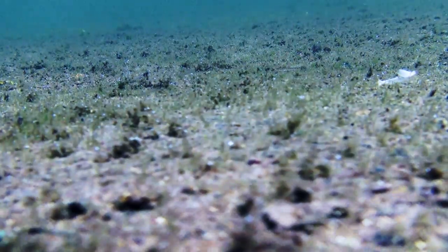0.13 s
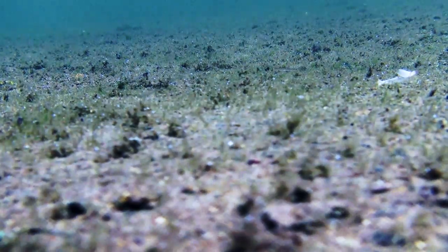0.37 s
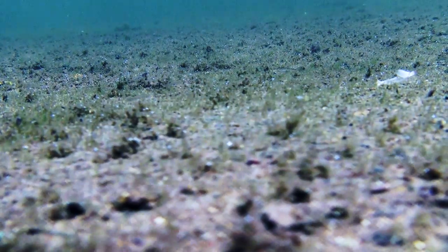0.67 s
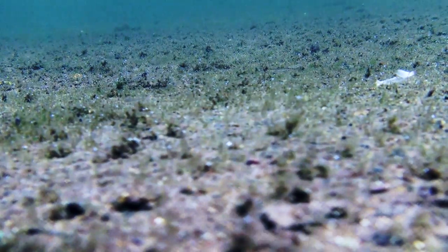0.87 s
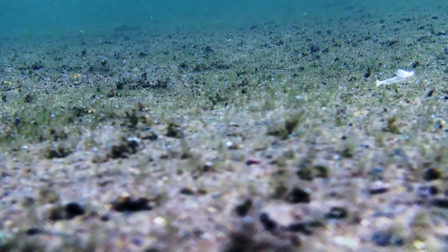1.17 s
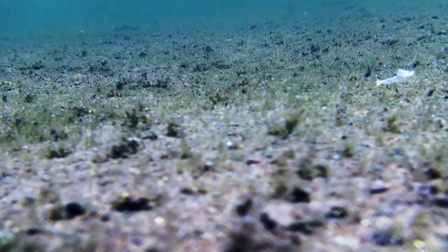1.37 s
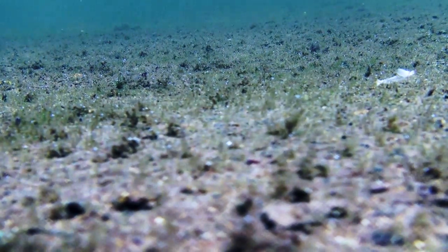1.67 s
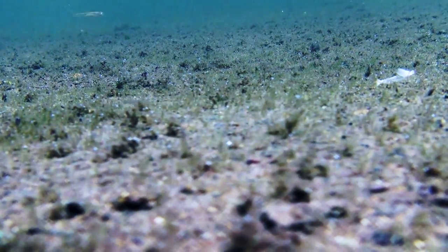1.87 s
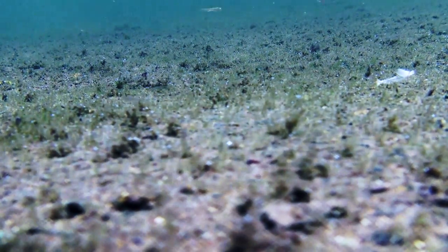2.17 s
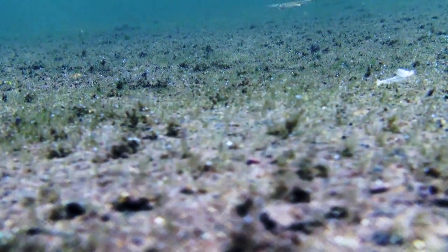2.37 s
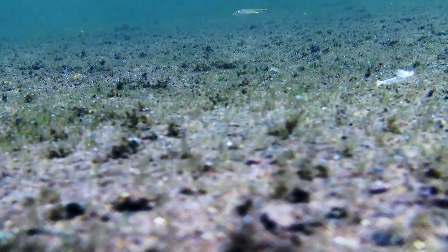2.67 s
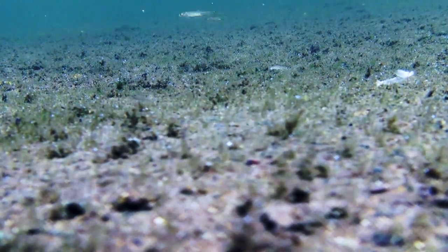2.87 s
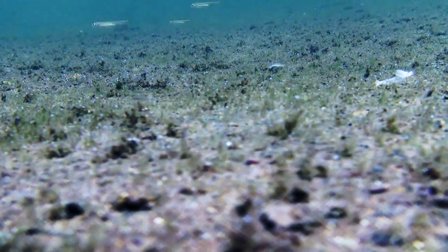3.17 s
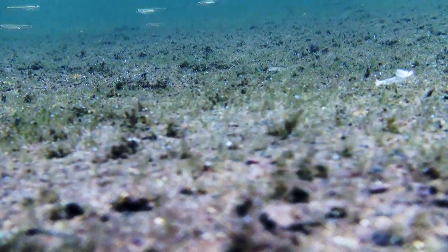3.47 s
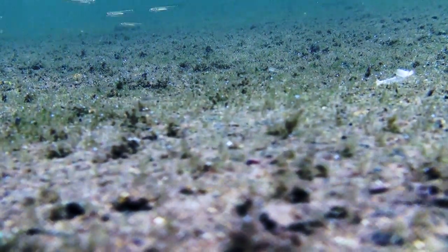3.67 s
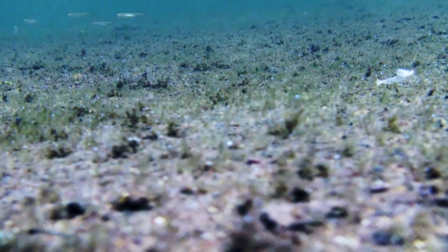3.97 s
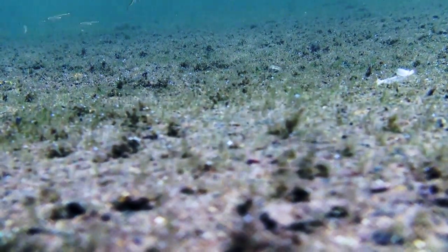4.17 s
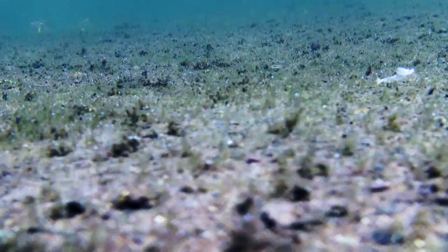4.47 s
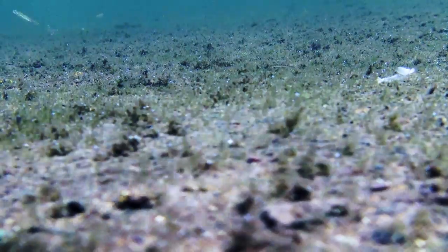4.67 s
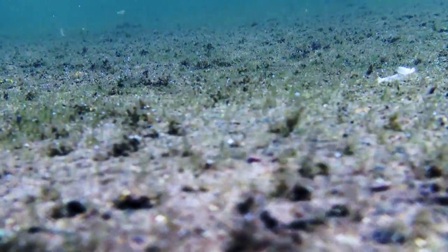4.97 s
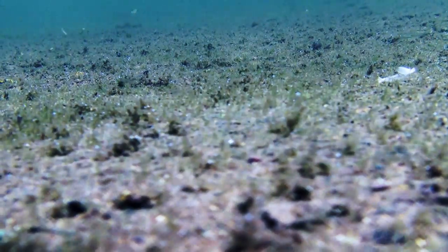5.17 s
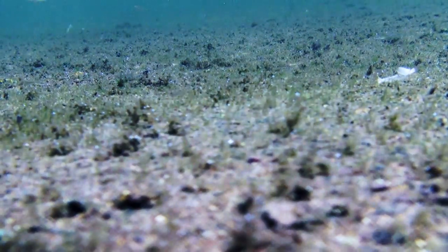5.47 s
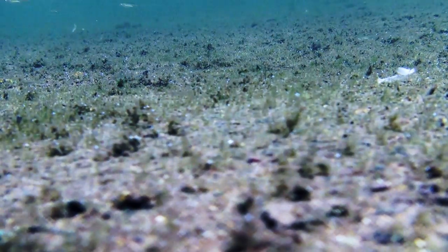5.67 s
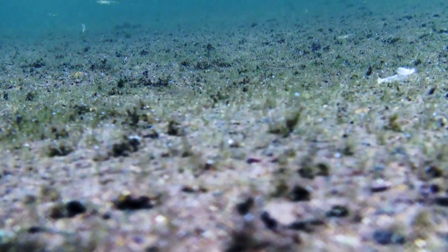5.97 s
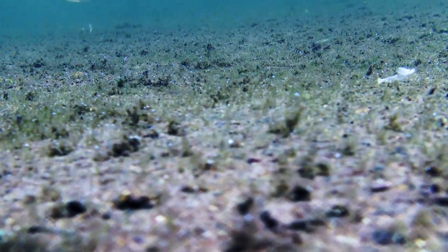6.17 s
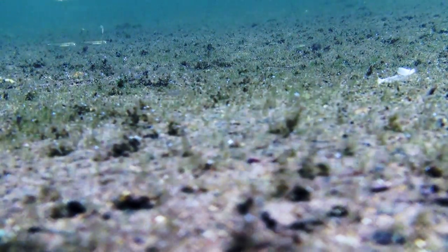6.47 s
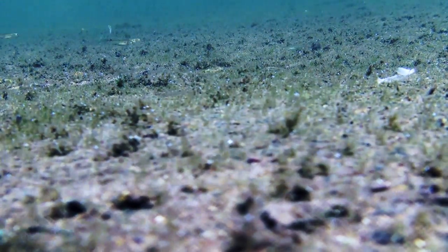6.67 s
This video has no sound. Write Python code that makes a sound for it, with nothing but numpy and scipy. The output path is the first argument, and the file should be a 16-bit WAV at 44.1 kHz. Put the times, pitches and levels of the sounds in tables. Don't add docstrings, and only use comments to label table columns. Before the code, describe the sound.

Inside a sealed housing on a stony river bed, turbulent water hisses steadily with a fine sprinkle of grit. Dull, low, short-ringing knocks come in a busy cluster during the first second, then thin out. A stronger bunch of thumps and a brief surge of water arrive just after three seconds, followed by scattered single and double knocks. Small hollow ticks accompany some of them. Very close, muffled and dry.

```python
import sys
import numpy as np
from scipy import signal
from scipy.fft import rfft, irfft
from scipy.io import wavfile

SR = 44100
rng = np.random.default_rng(int(sys.argv[2]) if len(sys.argv) > 2 else 0)


def to_linear_factor(level_db):
    exponent = np.asarray(level_db, float) / 20
    return 10 ** exponent


def wav_record(signal):
    frames = np.transpose(np.atleast_2d(signal))
    bounded = np.clip(frames, -1, 1)
    quanta = np.round(bounded * 32767).astype(np.int16)
    wavfile.write(sys.argv[1], SR, quanta)


N = 300879

# (pitch [Hz], rise time [s], time to fall 60 dB [s], level [dB])
HOUSING_MODES = [
    (146.6, 0.0037, 0.19, -0.5),
    (213, 0.006, 0.085, 4),
    (289.3, 0.002, 0.062, 6),
    (65, 0.0039, 0.17, -2.5),
]
CONTACT_LEAD_S = 0.003


def rms_one(x):
    return x / np.sqrt(np.mean(x ** 2) + 1e-20)


def coloured(points):
    hz, db = np.transpose(points)
    bins_hz = np.maximum(np.arange(N // 2 + 1) * SR / N, 1)
    colour_db = np.interp(np.log(bins_hz), np.log(hz), db)
    return rms_one(irfft(rfft(rng.standard_normal(N)) * to_linear_factor(colour_db), N))


def drift(rate_hz):
    r = np.exp(-2 * np.pi * rate_hz / SR)
    wander = signal.lfilter([1], [1, -2 * r, r * r], rng.standard_normal(N + SR))
    return rms_one(wander[SR:])


def through_shell(x):
    # (centre [Hz], width [Hz], level [dB])
    shell_peaks = [(447, 126, 4.5), (637, 81, -6), (910, 113, 8.5), (999.6, 75, -10.5), (1129, 65, 5.5),
                   (1186, 51, -8), (1304, 125, 3.5), (1489, 196, 9), (1750, 510, -6), (2013, 133, -16.5),
                   (2170, 185, 4), (2600, 450, 3.5), (2760, 137, -8.5), (2875, 126, 4.5), (3250, 110, -1),
                   (3380, 110, 2.5), (3780, 170, -5), (4770, 340, 7.5), (5600, 220, -0.5), (5910, 170, 11)]
    filters = []
    for hz, width_hz, db in shell_peaks:
        g = to_linear_factor(db / 2)
        a = np.pi * width_hz / SR
        c = -2 * np.cos(2 * np.pi * hz / SR)
        row = np.array([1 + a * g, c, 1 - a * g, 1 + a / g, c, 1 - a / g])
        filters.append(row / (1 + a / g))
    return signal.sosfilt(filters, x)


def sand_grains(grit_per_s):
    size_db = 3.9 * np.minimum(rng.exponential(1, N), 4)
    clicks = to_linear_factor(size_db) * rng.choice([-1, 1], N) * (rng.random(N) < grit_per_s / SR)
    band = signal.butter(4, [250, 1800], "band", fs=SR, output="sos")
    return rms_one(signal.sosfilt(band, clicks))


def current(flicker_db, grit_per_s, grit_db):
    # (frequency [Hz], level per Hz [dB])
    water_colour = [(20, -7.5), (40, -6), (60, -14.5), (100, -9), (200, -5.5), (400, -4.5), (1500, -3),
                    (2500, -8), (3400, -18.5), (3800, -30), (5000, -31.5), (7000, -53.5), (16000, -67)]
    # (time [s], level above usual [dB])
    turbulence = [(0.0, 0), (0.5, 1), (0.97, -2.5), (1.31, 1), (1.8, -0.8), (2.62, -1), (3.1, -2),
                  (3.25, 9), (3.38, -1.5), (3.6, 1.7), (4.6, -1), (5.36, 2.5), (5.81, -1.5), (6.32, -0.2),
                  (6.82, 1.5)]
    edges_hz = 20, 200, 770, 2000, 16000
    shares = 0.95, 0.32, 0.071, 0.063
    water = coloured(water_colour) + to_linear_factor(grit_db) * sand_grains(grit_per_s)
    steady = rfft(rms_one(through_shell(water)))
    hz = np.arange(len(steady)) * SR / N
    flow_db = np.interp(np.arange(N) / SR, *np.transpose(turbulence))
    out = np.zeros(N)
    for low, high, share in zip(edges_hz, edges_hz[1:], shares):
        flicker = flicker_db * (drift(17.0) + 0.57 * drift(40))
        band = irfft(steady * (hz >= low) * (hz < high), N)
        out += to_linear_factor(share * flow_db + flicker) * band
    return to_linear_factor(-46.5 + 0.99) * out


def add_ring(out, s, db, hz, rise_s, t60):
    damping_growth = 1.14
    at = int(s * SR)
    length = min(int(1.2 * t60 * SR) + 9, N - at)
    t = (np.arange(length) + 1 - (s * SR - at)) / SR
    swell = (1 - np.exp(-t / rise_s)) ** 2
    shape = swell * to_linear_factor(-60 * (t / t60) ** damping_growth)
    out[at:at + len(t)] -= to_linear_factor(db) * shape / shape.max() * np.sin(2 * np.pi * hz * t)


def knocks(detune):
    # (time [s], peak level [dB], edge-on tilt [dB], ring length [factor])
    firm_knocks = [(0.155, -32, -5, 0.88), (0.166, -28.5, -2.5, 0.45), (0.187, -38, -5, 0.69),
                   (0.368, -41, -2, 0.83), (0.391, -41, -22, 0.85), (0.479, -41.5, 7, 0.7),
                   (0.499, -45, -1, 0.86), (0.544, -40, 3.5, 1.16), (0.567, -36, -13, 0.8),
                   (0.780, -33.5, -7, 0.63), (0.807, -44, -2, 0.57), (0.933, -38.5, -6, 0.73),
                   (1.328, -36.5, -0.5, 0.64), (1.34, -39.5, 10, 0.9), (3.128, -37.5, -12, 0.55),
                   (3.146, -41, -3.5, 0.8), (3.190, -32.5, -4.5, 1.2), (3.1995, -34, 13, 0.51),
                   (3.216, -35.5, 9, 1.35), (3.2415, -30.5, 16, 1), (3.604, -37, -13, 0.45),
                   (3.617, -45, 0.5, 0.91), (4.1, -36.5, -5, 0.89), (4.701, -32, -18, 0.64),
                   (4.708, -30, -7.5, 1.12), (4.862, -42.5, 0, 0.81), (5.171, -36.5, 9, 1.1),
                   (5.176, -28.5, -10, 0.77), (5.557, -38.5, -19, 0.83), (6.692, -41.5, -4, 0.72)]
    # (time [s], peak level [dB], edge-on tilt [dB])
    light_nudges = [(0.034, -51.5, 6), (.104, -46.5, 1.5), (0.596, -47, 2), (.66, -49, -1.5),
                    (.881, -47.5, 9), (.958, -48.5, -4), (1.199, -56, 8), (1.378, -49.5, 5),
                    (1.616, -55.5, -3), (3.169, -46, -3), (3.871, -47, -6.5), (3.901, -52, -12),
                    (4.005, -52, -2.5), (4.232, -57, 8), (5.548, -50, 6), (6.674, -46.5, -2.5),
                    (6.714, -50, 0), (6.762, -49.5, -6)]
    nudge_length, third_mode_db, sway_db = 1.12, -5, -20.5
    hits = list(firm_knocks) + [tuple(row) + (nudge_length,) for row in light_nudges]
    out = np.zeros(N)
    chance = rng.standard_normal((len(hits), len(HOUSING_MODES)))
    for (s, peak_db, tilt_db, length), shifts in zip(hits, chance):
        length = max(length, 0.2)
        first_db = peak_db - max(tilt_db, 0)
        second_db = peak_db + min(tilt_db, 0)
        levels = first_db, second_db, second_db + third_mode_db, peak_db + sway_db
        for level_db, shift, (hz, rise_s, t60, db) in zip(levels, shifts, HOUSING_MODES):
            pitch_hz = hz * (1 + detune * shift)
            add_ring(out, s - CONTACT_LEAD_S, level_db + db, pitch_hz, rise_s * length, t60 * length)
    return out


def sways():
    # (time [s], peak level [dB])
    tips = [(.104, -51), (.166, -50), (.368, -48), (.597, -46), (.807, -47), (1.328, -51), (3.244, -47),
            (3.617, -53), (4.1, -52), (4.289, -54), (4.859, -49), (4.884, -54), (5.179, -44), (6.138, -57),
            (6.692, -61)]
    out = np.zeros(N)
    hz, rise_s, t60, db = HOUSING_MODES[-1]
    for s, peak_db in tips:
        add_ring(out, s - CONTACT_LEAD_S, peak_db + db, hz, rise_s, 0.97 * t60)
    return out


def ticks():
    # (time [s], peak level [dB], pitch [Hz])
    strikes = [(.155, -37, 480), (.166, -39, 560), (.62, -32.5, 480), (0.728, -32.5, 510),
               (0.7284, -33, 1340), (.7492, -28, 1520), (.756, -32, 1550), (.793, -38, 1750),
               (.812, -34, 1470), (0.816, -35, 473), (1.326, -43, 3150), (1.337, -38, 297),
               (1.327, -36, 1500), (1.327, -41, 2270), (1.328, -31.5, 715), (3.135, -36, 910),
               (3.191, -31, 496), (3.202, -32, 606), (3.222, -35, 540), (3.244, -25.5, 540),
               (3.246, -36, 1300), (4.704, -41, 680), (4.715, -39, 405), (5.167, -36, 590),
               (5.178, -39, 480), (5.18, -45, 720), (6.351, -35.5, 454), (6.3712, -33, 715),
               (6.378, -36, 600), (6.403, -35, 1310)]
    out = np.zeros(N)
    for s, db, hz in strikes:
        ring_s = max(0.007 + 3.0 / hz, 0.003)
        add_ring(out, s, db, hz, 0.42 / hz, ring_s)
    return out


def self_noise():
    # (frequency [Hz], level per Hz [dB])
    hiss_colour = [(3820, -30), (6500, -1.5), (14900, -6), (15500, -6)]
    flat_below = [(20, hiss_colour[1][1])] + list(hiss_colour[1:])
    return to_linear_factor(-76.5 + 4.0) * coloured(flat_below)


def scene():
    capsule = current(flicker_db=0.63, grit_per_s=200, grit_db=-10.0)
    capsule += knocks(detune=0.019) + sways() + ticks() + self_noise()
    return np.array([capsule, capsule])


def gain_control():
    duck_s, duck_db, recover_db_per_s = 3.2, 2.1, 2.3
    since = np.arange(N) / SR - duck_s
    drop_db = (since > 0) * np.maximum(duck_db - recover_db_per_s * since, 0)
    return to_linear_factor(-signal.lfilter([0.002], [1, -0.998], drop_db))


def roll_off(x):
    return signal.sosfilt(signal.butter(12, 15670, fs=SR, output="sos"), x)


def record(dry):
    phase_corner_hz = 1058, 1660
    top_cut_hz, width_top_hz = 15720, 3580
    dry = signal.sosfilt(signal.ellip(10, 0.3, 60, top_cut_hz, fs=SR, output="sos"), dry)
    levelled = gain_control() * dry
    corners = np.tan(np.pi * np.array(phase_corner_hz) / SR)
    left, right = (signal.lfilter([c - 1, c + 1], [c + 1, c - 1], x) for x, c in zip(levelled, corners))
    bins_hz = np.arange(N // 2 + 1) * SR / N
    side = irfft(rfft(left - right) * (bins_hz < width_top_hz), N)
    mix = (left + right + side * [[1], [-1]]) / 2
    return roll_off(mix)


dry = scene()
out = record(dry)
wav_record(out)
```